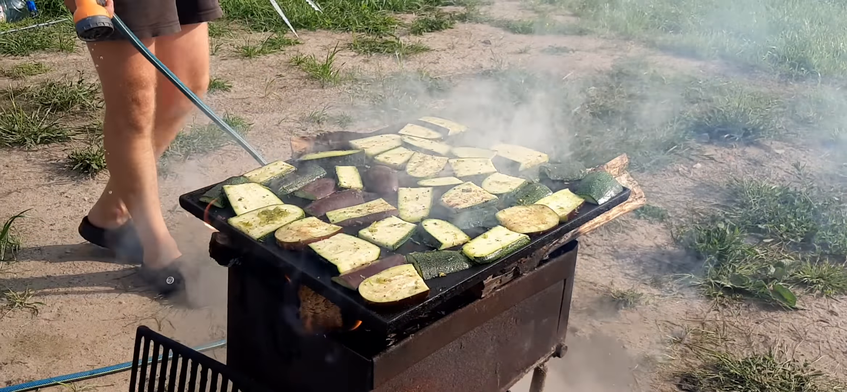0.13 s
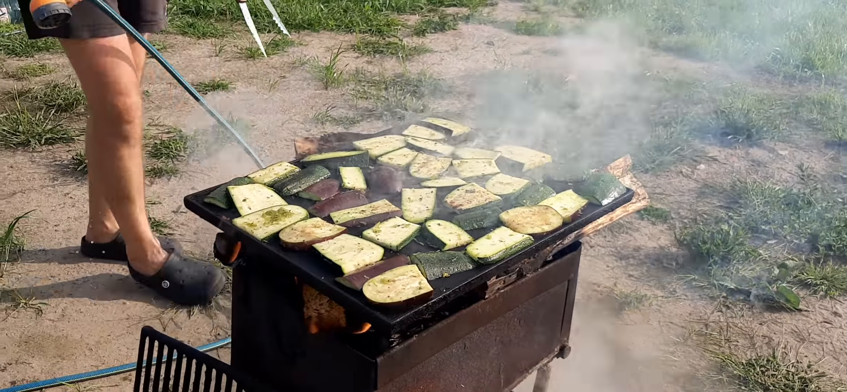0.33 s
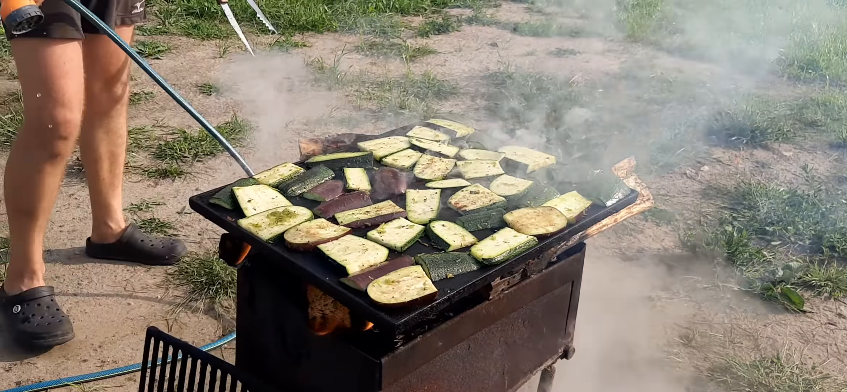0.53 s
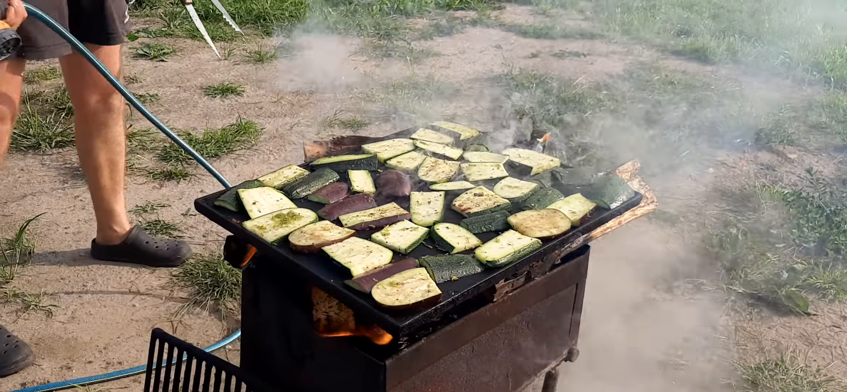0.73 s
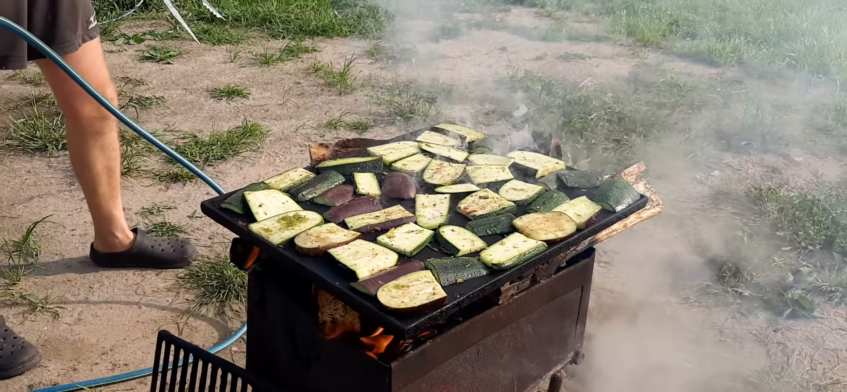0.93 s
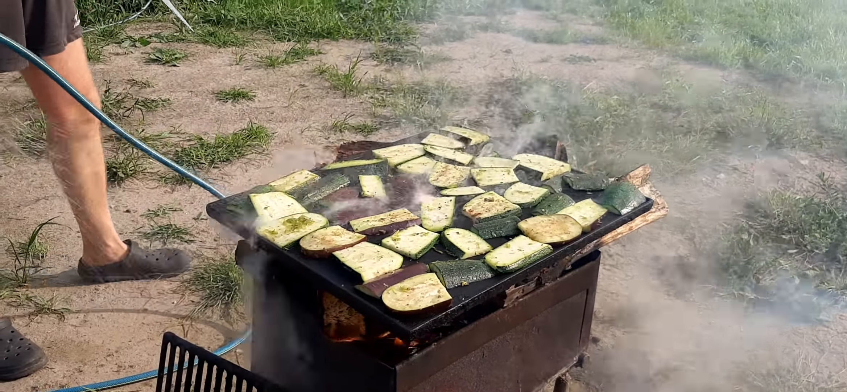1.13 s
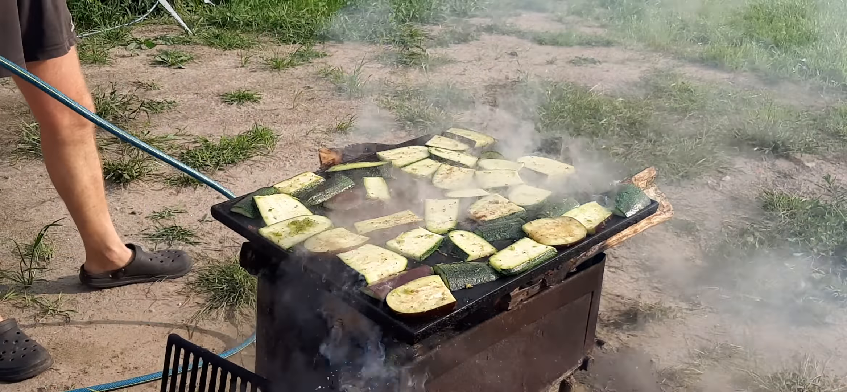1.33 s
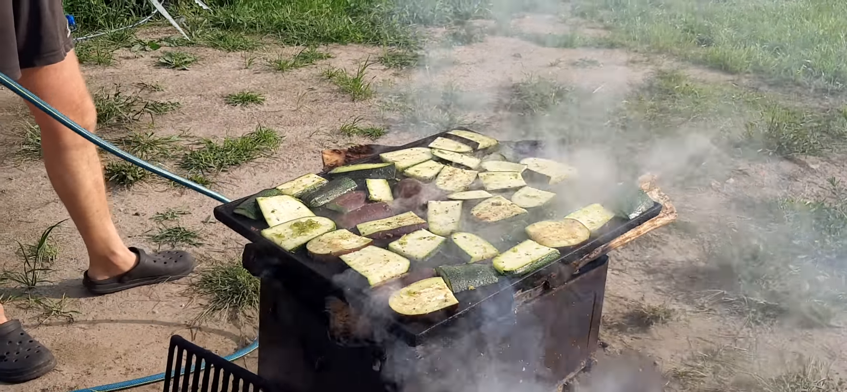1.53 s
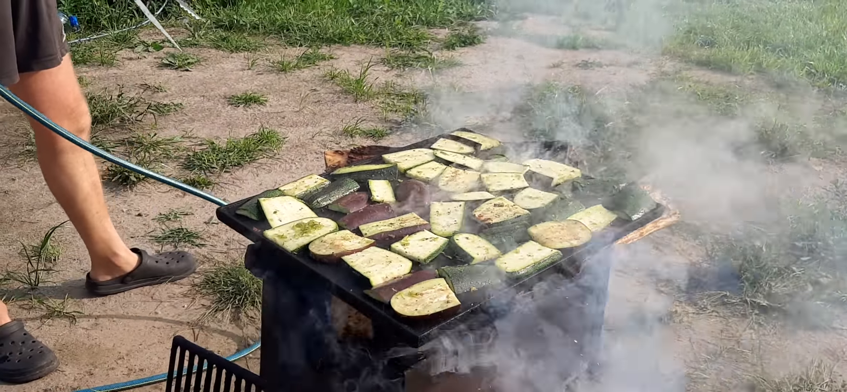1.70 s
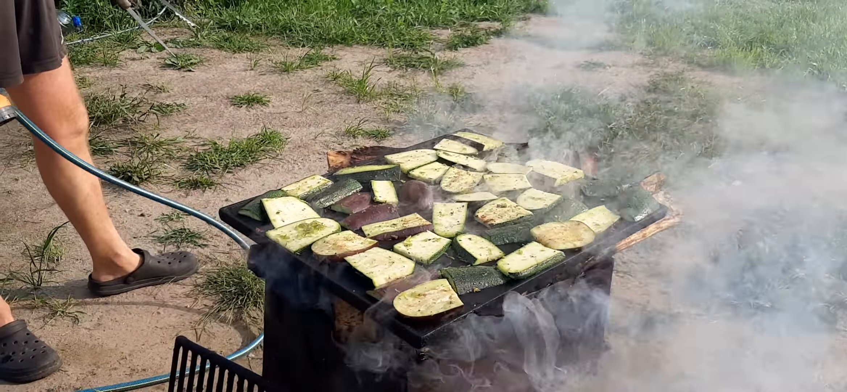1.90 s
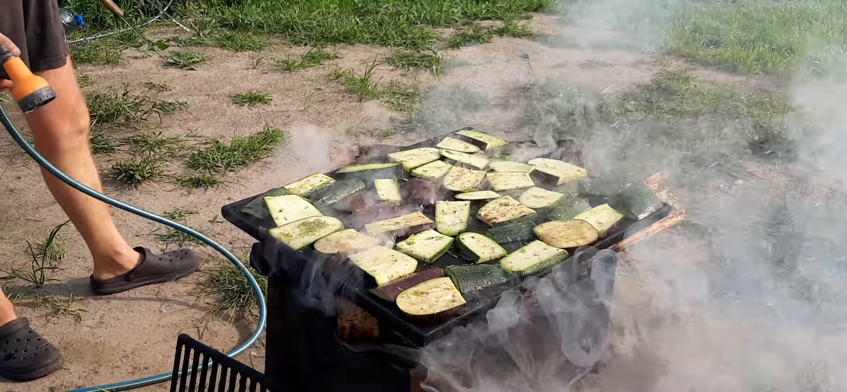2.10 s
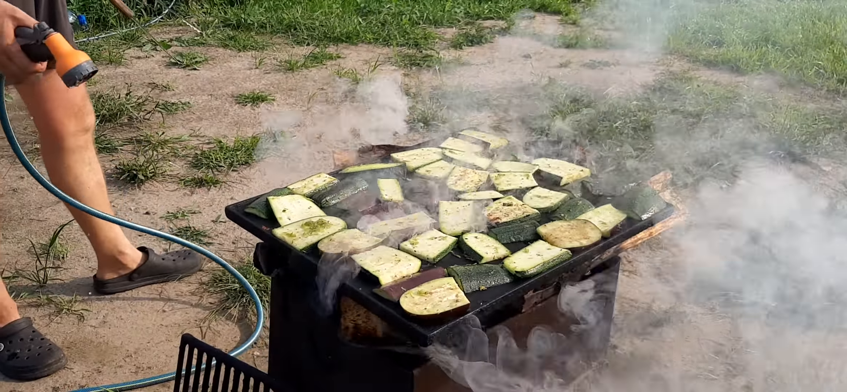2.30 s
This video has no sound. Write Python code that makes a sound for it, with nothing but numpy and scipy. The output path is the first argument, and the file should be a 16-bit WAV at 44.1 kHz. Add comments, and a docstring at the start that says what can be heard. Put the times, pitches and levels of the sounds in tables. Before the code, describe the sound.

Sliced vegetables sizzle steadily on a steel plate over a wood fire; a bright hiss flares briefly, then water hits with a short hollow roar and fades as steam, with fat pops. Close, dry outdoor stereo.

```python
"""Vegetables sizzling over a wood fire

Sliced vegetables sizzle on a steel plate outdoors: bubble clicks and noise, coloured band by band.
A thin bright hiss flares up, then water lands with a short noise roar through the firebox resonances
and boils off as a fading fizz. Fat pops as short noise snaps, vapour jets as narrow bands of hiss,
and low noise makes the drone of the fire and a soft rustle."""
import sys
import numpy as np
from scipy import signal
from scipy.fft import rfft, irfft
from scipy.io import wavfile
from scipy.ndimage import uniform_filter1d

SR = 44100
rng = np.random.default_rng(int(sys.argv[2]) if len(sys.argv) > 2 else 0)


def output_pcm(signal):
    """Save a mono or channel-first signal as 16-bit PCM at the path in sys.argv[1].

    Samples are clipped to [-1, 1] before scaling.
    """
    pcm = np.clip(np.atleast_2d(signal).T, -1, 1) * 32767
    wavfile.write(sys.argv[1], SR, np.round(pcm).astype(np.int16))


N = 103635
T = np.arange(N) / SR
HZ = np.fft.rfftfreq(N, 1 / SR)

# Colour of the steady sizzle: pitch_hz, density_db (dB per Hz, relative)
SIZZLE_COLOUR = [(120, -30.5), (330, -18.5), (540, -36), (720, -19.5), (1080, -18.5), (1330, -7),
                 (1540, 0.5), (1800, -8.5), (2050, -0.5), (2400, -8.5), (2700, -4), (2950, -13),
                 (3400, -0.5), (4100, 0.5), (6300, -4), (8000, 1.5), (9800, -0.5), (10900, 3), (12000, 4),
                 (13100, -2.5), (15100, 8), (16000, -1)]
# Strength of the sizzle before its trim: time_s, level_db
SIZZLE_STRENGTH = [(0, -41.5), (.12, -39), (.33, -40.5), (.46, -40.5), (.62, -38), (.88, -36.5),
                   (1.1, -35.5), (1.7, -38.5), (2.35, -41.5)]
SIZZLE_TRIM_DB = 3
SIZZLE_BUBBLES_PER_S, SIZZLE_BUBBLE_SHARE, SIZZLE_SPREAD_DB = 2200, 0.48, 3.5

# Spurts of flaring hiss: peak_s, level_db, pan_db (left minus right), top_lift_db
FLARE_SPURTS = [(.665, -30, 2.5, -6), (.732, -24, -15, 4.5)]
# Colour of the flaring hiss: pitch_hz, density_db (dB per Hz, relative)
FLARE_COLOUR = [(400, -37.5), (2500, -19.5), (4000, -8), (6500, -14), (8600, -5), (9600, -10), (10900, -2),
                (12000, -2), (13100, -10), (14400, -4), (16000, 2)]
# The top lift of a spurt sets in between these two: pitch_hz
FLARE_LIFT_HZ = [12000, 14500]
FLARE_RISE_DB_PER_S, FLARE_FALL_DB_PER_S = 70, 72

# Vapour jets from under single slices: peak_s, half_length_s, pitch_hz, level_db, pan_db (left minus right)
VAPOUR_JETS = [(.235, .025, 15200, -37, -12), (0.342, 0.077, 12000, -44.5, 18),
               (1.03, 0.062, 10800, -50, 32)]
JET_WIDTH_HZ = 3700

# Colour of the water's roar: pitch_hz, density_db (dB per Hz, relative)
ROAR_COLOUR = [(30, -17), (100, -5), (220, -8.5), (400, -4), (700, -6.5), (1150, -9.5), (1350, -1),
               (1750, -6.5), (2250, -6), (2500, -13), (3000, -13), (3850, -6.5), (5000, -21), (9000, -25),
               (16000, -36)]
# Resonances of the firebox: pitch_hz, width_hz, lift_db
BOX_RESONANCES = [(540, 150, 4.5), (895, 150, 8), (1480, 25, 7), (2028, 89, 7.5), (2744, 40, 14.5)]
# Late spatters of water as the roar dies: peak_s, half_length_s, level_db (relative to the roar)
SPATTERS = [(1.312, 0.022, -17.5), (1.435, 0.028, -25), (1.496, 0.0059, -18)]
# Likeness of the roar in the two channels: pitch_hz, likeness (0 to 1)
ROAR_LIKENESS = [(700, 1), (1450, 1), (2200, 0.35), (4000, 0.93), (16000, 0.22)]
SPLASH_S, ROAR_DB = 1.1136, -26.5
ROAR_RISE_S, ROAR_HOLD_S, ROAR_SAG_DB_PER_S, ROAR_FALL_DB_PER_S = 0.05, 0.14, 14.5, 183
ROAR_LEAD_S = .00007  # left ahead of right

# Colour of the steam: pitch_hz, density_db (dB per Hz, relative)
STEAM_COLOUR = [(120, -21), (280, -21), (600, -18), (830, -13), (1050, -18), (1300, -12), (1530, -2.5),
                (1800, -8.5), (2050, -6.5), (3000, -9.5), (3800, -5.5), (5200, -3.5), (6200, -7),
                (7900, -3), (12000, 0.5), (13100, 0), (15200, 4), (16000, -1)]
STEAM_DB = -21.5
STEAM_RISE_S, STEAM_HOLD_S, STEAM_SAG_DB_PER_S, STEAM_FALL_DB_PER_S = 0.041, 0.51, 21.5, 39

# Pops of fat: start_s, level_db (before colour and pan), body_lift_db (lower treble and below)
FAT_POPS = [(.0962, -18, 0), (.4105, -12, -3), (.5703, -16, 2), (1.3762, -8, -2), (1.6808, -10, 7),
            (1.6829, -11.5, 5), (1.7248, -14, -4), (1.997, -9.5, -5), (2.0897, -16, -2)]
# Colour of a pop: pitch_hz, gain_db
POP_COLOUR = [(100, -32), (1000, -24), (2000, -11), (5000, -7), (9500, -9), (11800, -1), (16000, 0)]
# The body lift of a pop fades out between these two: pitch_hz
POP_LIFT_HZ = [4000, 12000]
POP_SCATTER_S, POP_SCATTER_DB = .001, 1  # time constant, energy over the snap before colouring
POP_PAN_DB = -4  # left minus right

# Colour of the fire at its resting pitch: pitch_hz, density_db (dB per Hz, relative)
FIRE_COLOUR = [(20, -35), (38, -27), (52, -2.5), (63, 4), (80, -5), (100, -12.5), (125, -28), (700, -31.5),
               (2000, -37)]
# Strength of the fire: time_s, level_db
FIRE_STRENGTH = [(0, -53), (.43, -51), (.51, -59), (.57, -51.5), (.82, -50.5), (.98, -57.5), (1.57, -54),
                 (1.63, -64.5), (1.87, -65.5), (1.95, -54), (2.07, -64), (2.19, -63), (2.25, -57.5),
                 (2.35, -66)]
# Glide of the drone from high to its resting pitch: time_s, pitch_hz
FIRE_GLIDE = [(.24, 77.1), (.35, 62.92)]

# Colour of the soft low rustle: pitch_hz, density_db (dB per Hz, relative)
RUSTLE_COLOUR = [(50, -2), (120, 7.5), (200, -8.5), (550, -10), (850, -9), (2400, -46)]
# Swells of the rustle: peak_s, half_length_s, level_db
RUSTLE_SWELLS = [(0.14, 0.068, -59), (0.678, 0.032, -57.5), (1.096, 0.094, -59.5), (2.046, 0.12, -61)]

# Bands where bubbles of five sizes ring: pitch_hz
BUBBLE_HZ = [700, 2500, 5500, 9500, 14500]
# Usual likeness of the two channels: pitch_hz, likeness (0 to 1)
CHANNEL_LIKENESS = [(80, .975), (150, .82), (600, .65), (1450, .7), (2200, .35), (3500, 0)]
# Tilt between the two channels: pitch_hz, balance_db (left minus right)
CHANNEL_BALANCE = [(60, -3.5), (700, -2.5), (1300, -5.5), (2400, -1), (4400, -3), (8300, -3), (9900, 1),
                   (10900, -2.5)]
CHANNEL_DELAY_S = .0003  # greatest offset of a click between the channels
EDGE_HZ = 15850


def sizzle():
    """Juice boils under the slices: bubble clicks over hiss, with a slowly moving level."""
    bubbles = boil(SIZZLE_BUBBLES_PER_S, SIZZLE_BUBBLE_SHARE, SIZZLE_SPREAD_DB,
                   flicker_db=0.6, flicker_hz=108)
    return amp(SIZZLE_TRIM_DB) * level(SIZZLE_STRENGTH) * colour(bubbles, read(SIZZLE_COLOUR))


def flare():
    """A bright hiss swells and fades in two overlapping spurts, the second thinner and to the right."""
    out = np.zeros((2, N))
    for peak_s, level_db, pan_db, top_lift_db in FLARE_SPURTS:
        fizz = boil(4600, share=0.47, spread_db=2.0, flicker_db=-1, flicker_hz=110)
        top_db = np.interp(HZ, FLARE_LIFT_HZ, [0, top_lift_db])
        hiss = colour(fizz, read(FLARE_COLOUR) + top_db)
        before_db = (peak_s - T) * FLARE_RISE_DB_PER_S
        after_db = (T - peak_s) * FLARE_FALL_DB_PER_S
        out += hiss * amp(level_db - np.maximum(before_db, after_db)) * pan(pan_db)
    return out


def jets():
    """Vapour escapes from under one slice or another as a brief band of hiss."""
    out = np.zeros((2, N))
    for peak_s, half_s, pitch_hz, level_db, pan_db in VAPOUR_JETS:
        band = 1 / (1 + (2 * (HZ - pitch_hz) / JET_WIDTH_HZ) ** 4)
        noise = rng.standard_normal((2, N))
        hiss = unit(irfft(rfft(noise, axis=1) * band, N, axis=1))
        out += hiss * swell(peak_s, half_s, level_db) * pan(pan_db)
    return out


def splash():
    """Water spatters on the hot steel and the resonances of the firebox colour the roar."""
    box_db = sum(lift_db / (1 + (2 * (HZ - pitch_hz) / width_hz) ** 2)
                 for pitch_hz, width_hz, lift_db in BOX_RESONANCES)
    spatter = boil(2000, share=0.48, spread_db=2.5, flicker_db=0.97, flicker_hz=58)
    roar = colour(spatter, read(ROAR_COLOUR) + box_db, ROAR_LIKENESS, ROAR_LEAD_S)
    flow = gush(ROAR_RISE_S, ROAR_HOLD_S, ROAR_SAG_DB_PER_S, ROAR_FALL_DB_PER_S)
    late = sum(swell(*row) for row in SPATTERS)
    return amp(ROAR_DB) * roar * (flow + late)


def steam():
    """The water boils away: a dense fizz of bubbles that sags, then fades faster."""
    bubbles = boil(6000, share=0.23, spread_db=2.0, flicker_db=1.05, flicker_hz=70)
    fizz = colour(bubbles, read(STEAM_COLOUR))
    return amp(STEAM_DB) * fizz * gush(STEAM_RISE_S, STEAM_HOLD_S, STEAM_SAG_DB_PER_S, STEAM_FALL_DB_PER_S)


def pops():
    """Fat bursts in sharp snaps, thin or full, each scattered briefly by the plate and the slices."""
    out = np.zeros((2, N))
    age = T[:SR // 40]
    for start_s, level_db, body_lift_db in FAT_POPS:
        snap = rng.standard_normal((2, len(age))) * np.exp(-age / POP_SCATTER_S)
        snap *= amp(POP_SCATTER_DB) / np.linalg.norm(snap[0])
        snap[:, 0] = -1  # the snap itself, ahead of its scatter
        body_db = np.interp(HZ, POP_LIFT_HZ, [body_lift_db, 0])
        tone = amp(level_db + read(POP_COLOUR) + body_db)
        pop = irfft(rfft(snap, N, axis=1) * tone, N, axis=1)
        out += np.roll(pop, round(start_s * SR), axis=1)
    return out * amp([[POP_PAN_DB / 2], [-POP_PAN_DB / 2]])


def fire():
    """Flames drone in the box: low noise settles in pitch, wavers in level and sinks late on."""
    steady = colour(rng.standard_normal((2, N)), read(FIRE_COLOUR))
    pitch_hz = np.interp(T, *np.transpose(FIRE_GLIDE))
    # reading the noise faster raises its pitch
    position = np.cumsum(pitch_hz / pitch_hz[-1])
    drone = np.array([np.interp(position, np.arange(N), side, period=N) for side in steady])
    # even out the noise's own swells so that the table sets the level
    strength = np.sqrt(uniform_filter1d((drone ** 2).mean(0), size=SR // 16))
    return level(FIRE_STRENGTH) * drone / strength


def rustle():
    """Low noise swells softly a few times under the sizzle."""
    noise = colour(rng.standard_normal((2, N)), read(RUSTLE_COLOUR))
    return sum(swell(*row) for row in RUSTLE_SWELLS) * noise


def boil(per_s, share, spread_db, flicker_db, flicker_hz):
    """Bursting bubbles, each size in its own band, over a hiss of countless tiny ones."""
    bubbles = 0
    for row in np.eye(len(BUBBLE_HZ)):
        band = np.sqrt(np.interp(HZ, BUBBLE_HZ, row))
        bubbles = bubbles + rfft(clicks(per_s, spread_db), axis=1) * band
    bubbles = irfft(bubbles, N, axis=1)
    hiss = rng.standard_normal((2, N))
    share = np.clip(share, 0, 1)
    mix = np.sqrt(share) * bubbles + np.sqrt(1 - share) * hiss
    return mix * amp(flicker_db * drift(flicker_hz))


def clicks(per_s, spread_db):
    """Random clicks of uneven size, each offset between the channels as if from its own direction."""
    chance, side, sign = rng.random((3, N))
    size = amp(spread_db * np.minimum(rng.exponential(1, N), 5))
    left = size * np.sign(sign - .5) * (chance < per_s / SR)
    offset = np.round((2 * side - 1) * CHANNEL_DELAY_S * SR).astype(int)
    arrival = (np.arange(N) + offset) % N
    return unit(np.array([left, np.bincount(arrival, left, N)]))


def gush(rise_s, hold_s, sag_db_per_s, fall_db_per_s):
    """Envelope from the moment the water lands: swelling rise, sagging hold, release."""
    age = np.maximum(T - SPLASH_S, 0)
    rise = np.sin(np.pi / 2 * np.minimum(age / rise_s, 1)) ** 2
    sag_db = sag_db_per_s * np.minimum(age, hold_s)
    fall_db = fall_db_per_s * np.maximum(age - hold_s, 0)
    return rise * amp(-sag_db - fall_db)


def swell(peak_s, half_s, db):
    """A smooth bell-shaped rise and fall in gain."""
    return amp(db) * np.exp(-((T - peak_s) / half_s) ** 2)


def colour(pair, spectrum_db, likeness=CHANNEL_LIKENESS, lead_s=0):
    """Filters two channels to a spectrum, blends them to a likeness, tilts their balance; rms 1."""
    a, b = rfft(pair, axis=1)
    same = np.clip(read(likeness), -1, 1)
    lean_db = read(CHANNEL_BALANCE) / 2
    shared = same * a * np.exp(-2j * np.pi * HZ * lead_s)
    right = shared + np.sqrt(1 - same ** 2) * b
    both = np.array([a * amp(lean_db), right * amp(-lean_db)])
    return unit(irfft(both * amp(spectrum_db), N, axis=1))


def pan(pan_db):
    """Left and right gains for a level difference, with constant power."""
    return unit(amp([[pan_db / 2], [-pan_db / 2]]))


def drift(rate_hz):
    """Random wander of rms 1, mostly slower than the rate."""
    spectrum = rfft(rng.standard_normal(N)) * (HZ > 3)
    return unit(irfft(spectrum / (1 + (HZ / rate_hz) ** 4), N))


def read(points):
    """Reads a table over frequency, joined on a log axis."""
    pitch_hz, value = np.transpose(points)
    return np.interp(np.log(HZ + 1), np.log(pitch_hz + 1), value)


def level(points):
    """Gain over time from (s, dB) points."""
    return amp(np.interp(T, *np.transpose(points)))


def amp(db):
    """Decibels to gain."""
    return 10 ** (np.asarray(db) / 20)


def unit(x):
    """Scales to rms 1."""
    return x / np.sqrt(np.mean(x ** 2) + 1e-20)


def scene():
    """Everything on and under the plate, with no room around it."""
    return sizzle() + flare() + jets() + splash() + steam() + pops() + fire() + rustle()


def record(dry):
    """A steep low-pass removes everything above the band edge."""
    lowpass = signal.firwin(601, EDGE_HZ, window=("kaiser", 8), fs=SR)
    return signal.oaconvolve(dry, lowpass[None], "same")


dry = scene()
out = record(dry)
output_pcm(out)
```